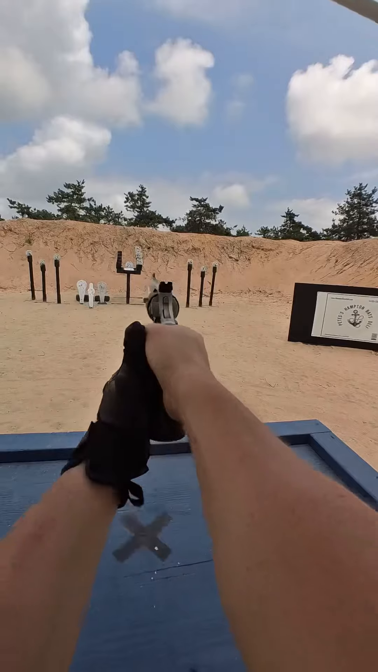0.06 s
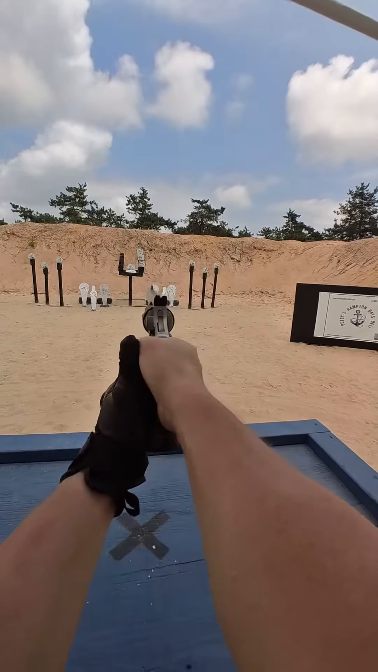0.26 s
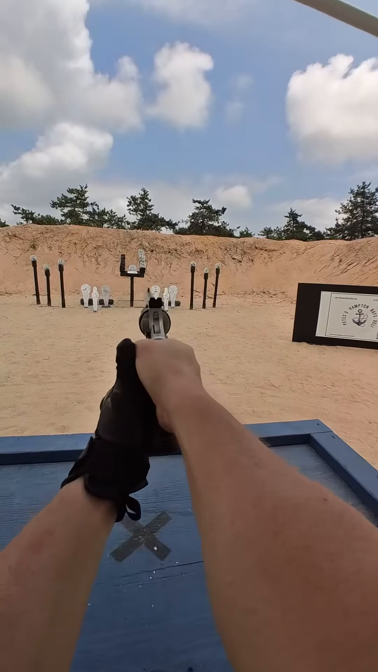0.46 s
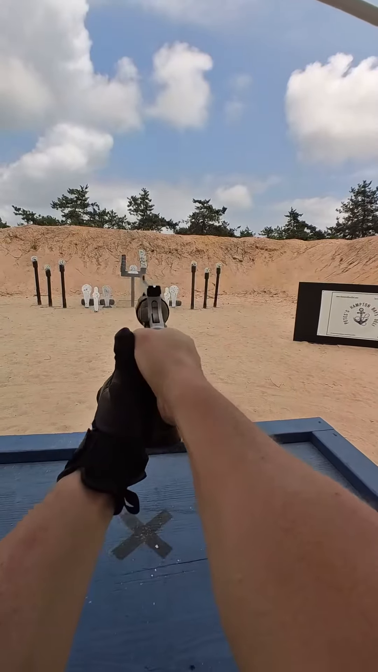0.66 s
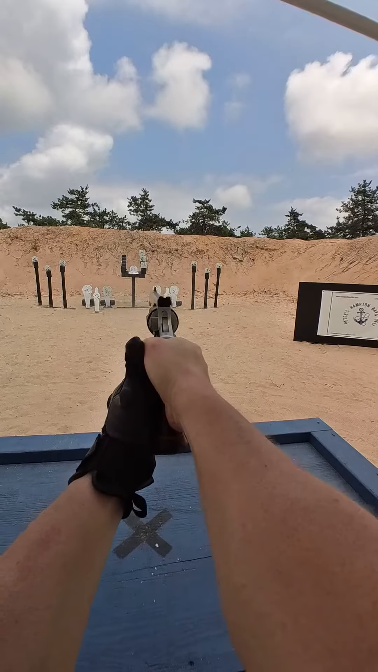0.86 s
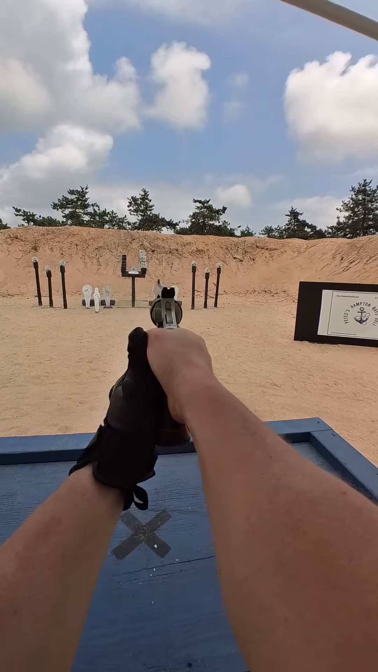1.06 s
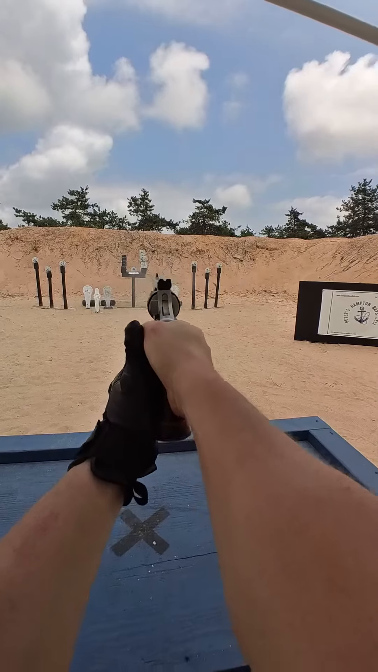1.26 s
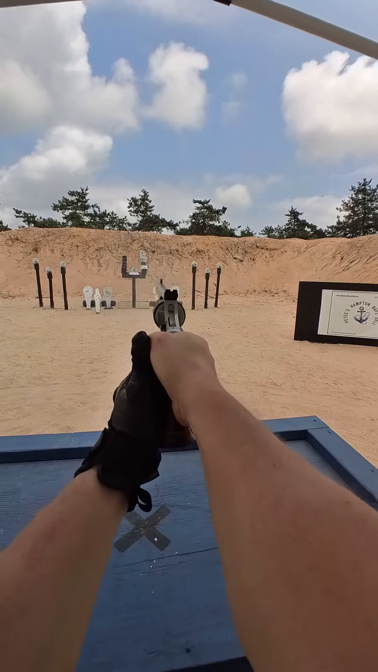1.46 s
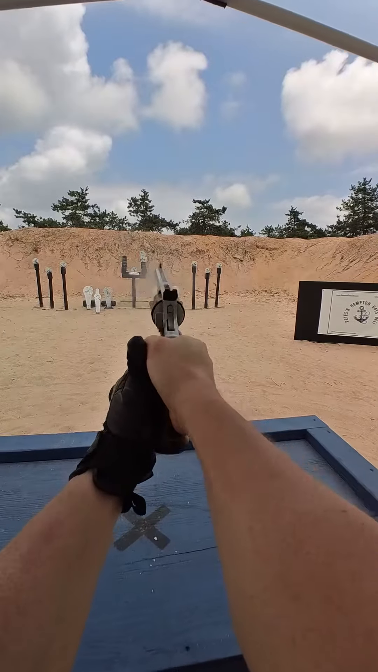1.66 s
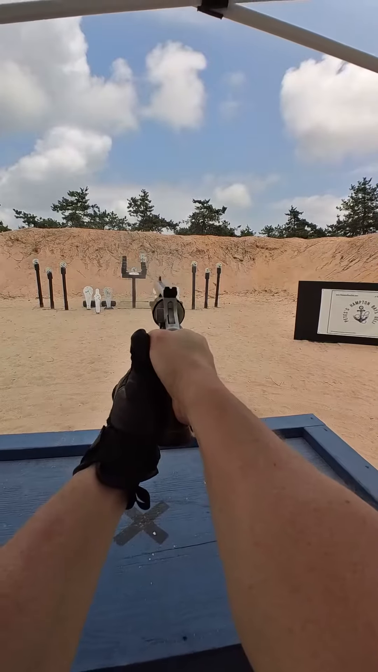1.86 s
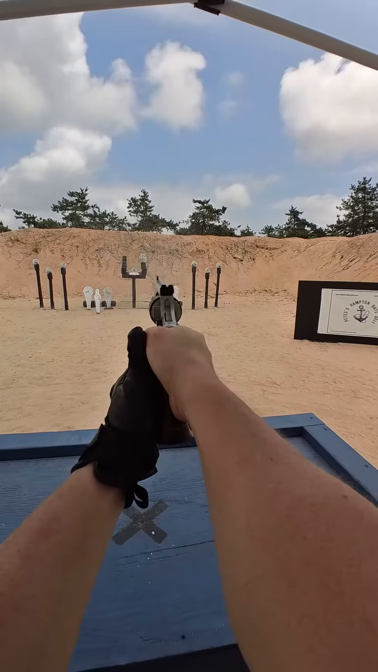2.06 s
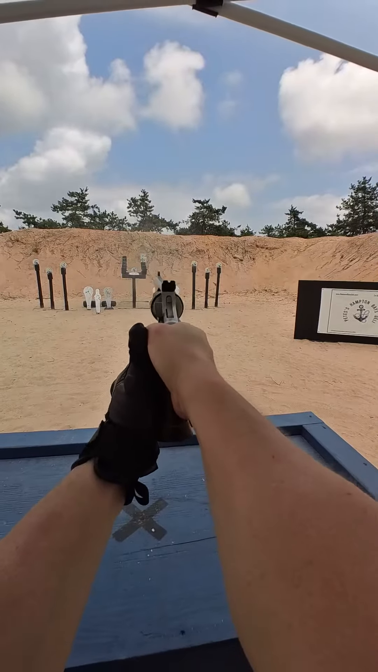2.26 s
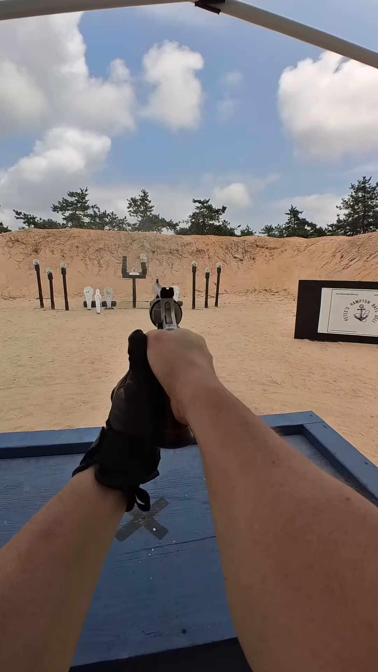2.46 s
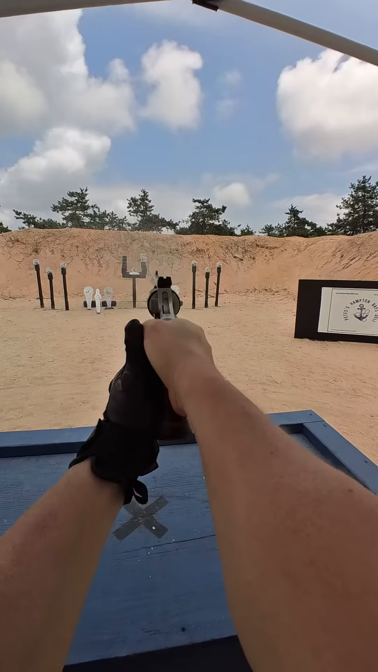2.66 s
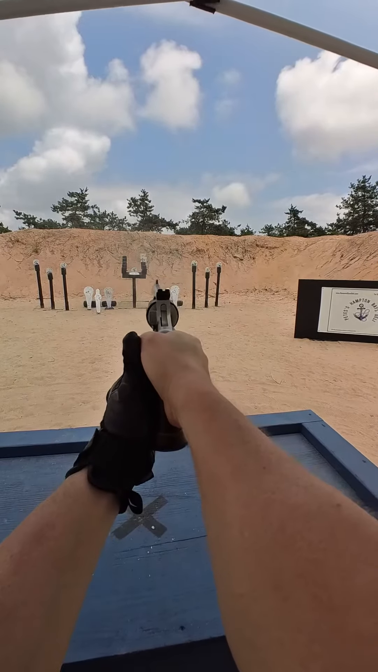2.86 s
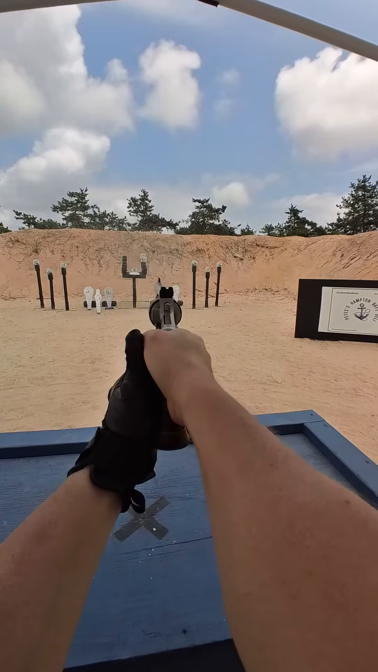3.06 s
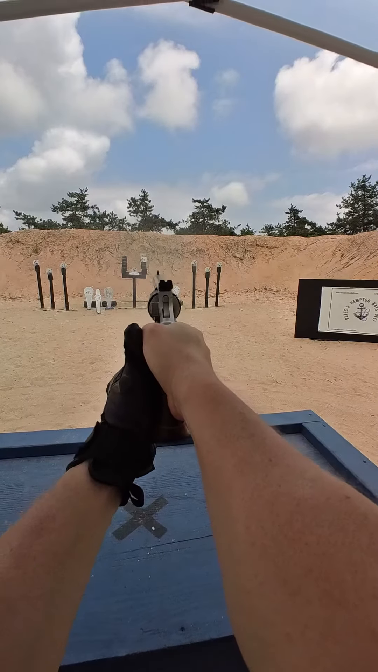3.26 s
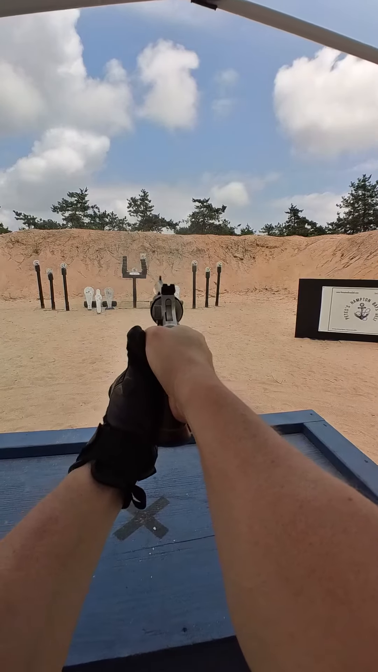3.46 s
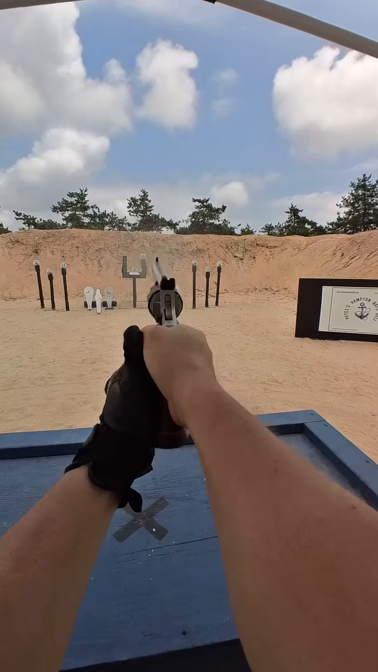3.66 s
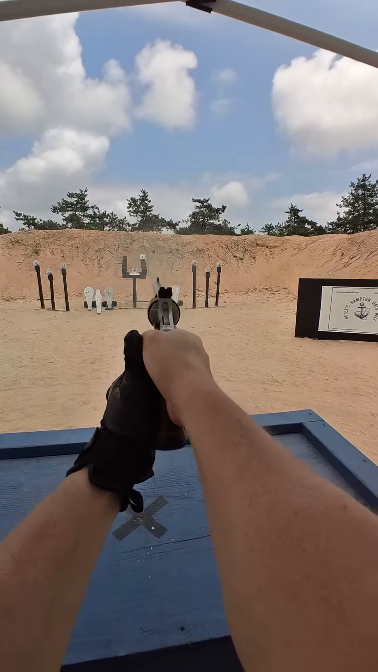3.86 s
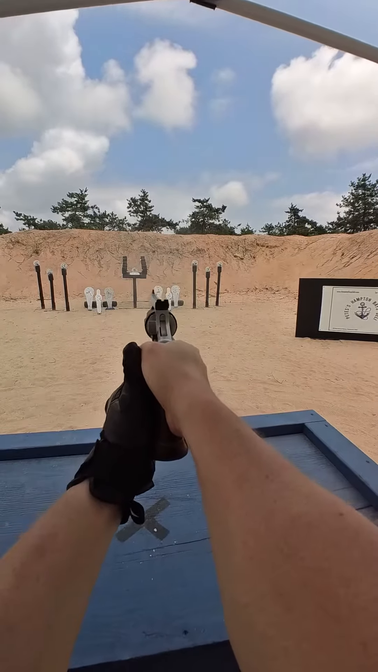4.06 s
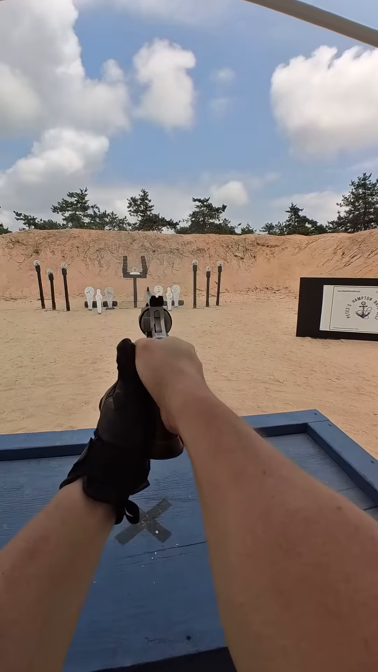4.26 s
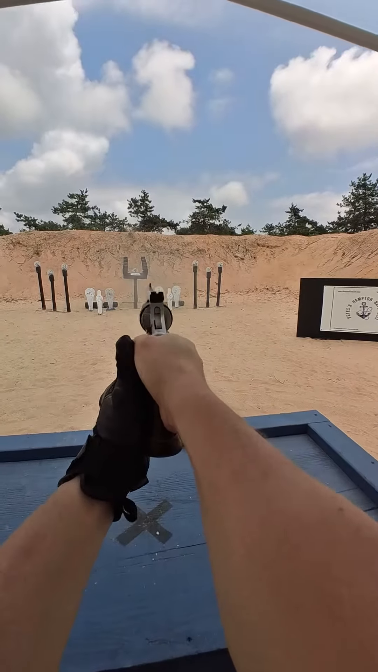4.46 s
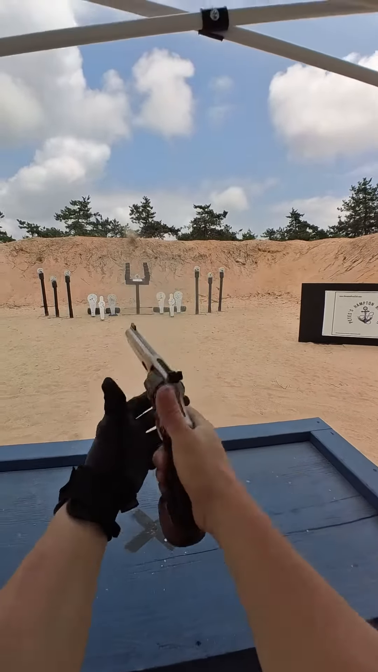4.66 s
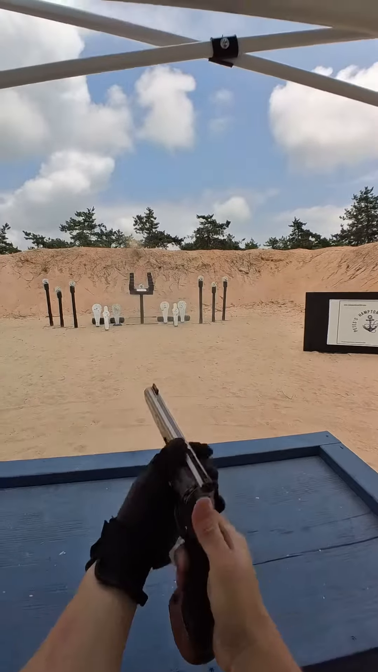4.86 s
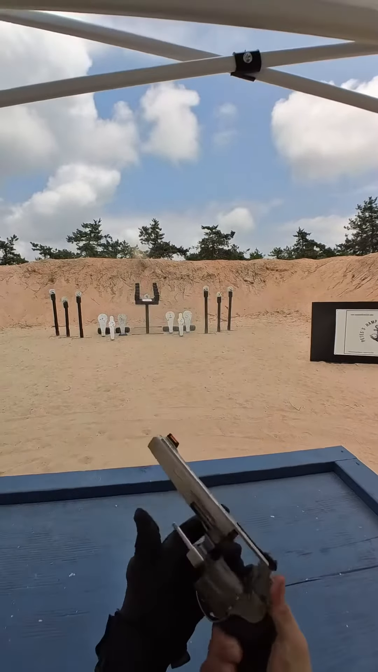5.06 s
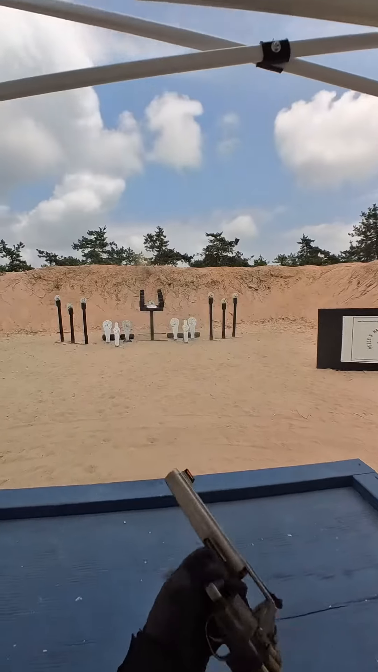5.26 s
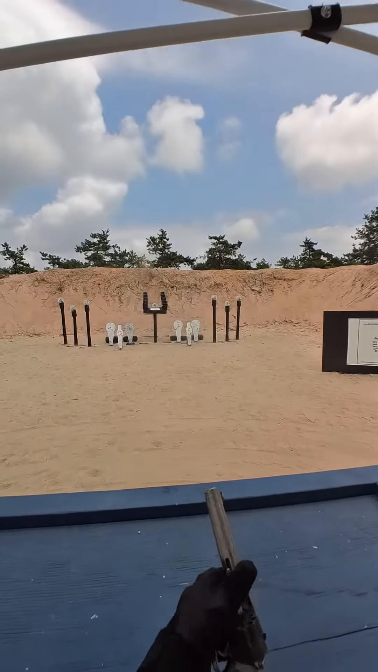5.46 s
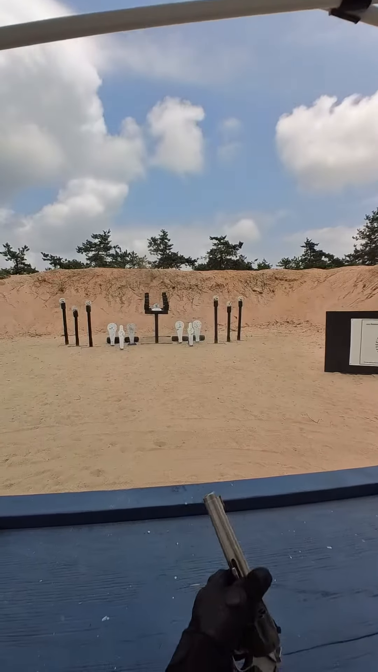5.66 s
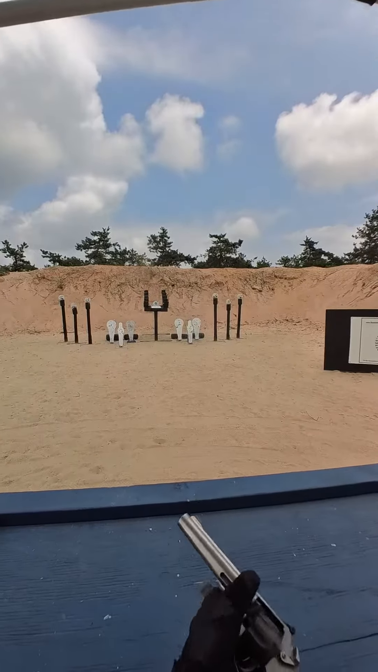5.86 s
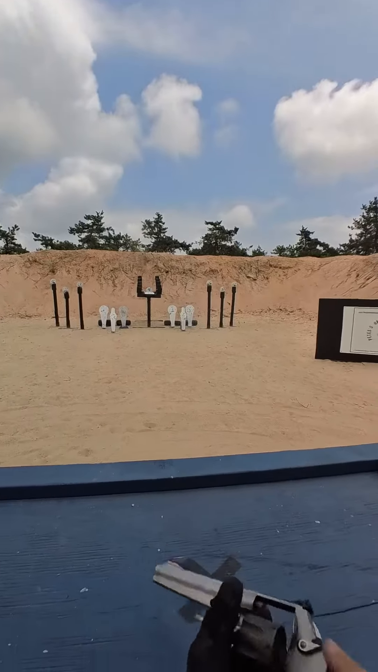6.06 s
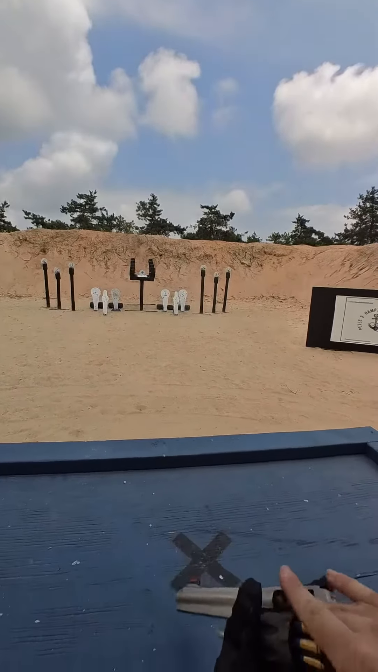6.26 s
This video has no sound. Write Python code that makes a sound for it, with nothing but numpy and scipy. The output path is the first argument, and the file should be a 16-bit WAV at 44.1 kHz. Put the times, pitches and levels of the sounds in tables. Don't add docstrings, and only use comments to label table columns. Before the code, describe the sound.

Shooter's-position stereo sound under a light roof outdoors: rapid revolver blasts, limited and roaring, with short slap echoes off sand banks. Distant steel plates sing at high, beating pitches after most shots, some landing with clanks and dull thuds. After the eighth shot the ringing dies, leaving quiet air and soft wind puffs. Small metallic snaps of the opening cylinder, light rustles and a gun set down on a wooden table finish it.

```python
import sys
import numpy as np
from scipy import signal
from scipy.fft import rfft, irfft, next_fast_len
from scipy.io import wavfile
from scipy.ndimage import uniform_filter1d, minimum_filter1d

SR = 44100
rng = np.random.default_rng(int(sys.argv[2]) if len(sys.argv) > 2 else 0)


def linear_from_db(decibels):
    return 10 ** (np.asarray(decibels, float) / 20)


def materialize(psi):
    bounded = np.clip(np.atleast_2d(psi).T, -1, 1)
    quanta = np.round(bounded * 32767).astype(np.int16)
    wavfile.write(sys.argv[1], SR, quanta)


N = 277817

# (frequency [Hz], coherence [0-1])
PORT_LIKENESS = [(60, 1), (150, 1), (600, 0.99), (1500, 0.89), (3000, 0.57), (6000, 0.19), (12000, 0.65)]

# (time [s], level [dB])
WIND_LEVEL = [(0.0, -44), (.3, -45.5), (.5, -41), (.65, -51), (1.04, -50), (1.08, -30), (1.12, -53),
              (2.0, -44.5), (2.37, -47), (2.5, -50), (2.77, -37.5), (3.02, -54), (3.28, -45), (3.4, -53.5),
              (4.1, -51.5), (5.49, -50.5), (5.81, -36), (6.3, -52.5)]
# (frequency [Hz], density [dB per Hz])
WIND_COLOUR = [(12, -22), (22, -6), (40, -1), (70, -2), (130, -9), (300, -28)]
# (frequency [Hz], density [dB per Hz])
AIR_COLOUR = [(35, -46), (60, -16), (258, -9.5), (501, -5), (549, -12), (1100, -16.5), (10400, -54),
              (14000, -101)]
AIR_DB = -49
# (middle [s], level [dB], half length [s])
RUSTLES = [(0.062, -47.5, 0.06), (5.3, -63.5, 0.82), (2.645, -40, 0.0032), (5.0, -38, 0.016),
           (5.173, -55, 0.033), (5.266, -44, 0.033), (5.449, -47, 0.015), (5.482, -36.5, 0.029),
           (5.7, -44, 0.033), (5.865, -34.5, 0.018), (5.903, -46, 0.028), (6.025, -57, 0.0096),
           (6.078, -46, 0.013), (6.18, -60, 0.021), (6.29, -52, 0.033), (1.152, -33, 0.0089),
           (3.514, -25, .014)]

# (frequency [Hz], density [dB per Hz])
TICK_COLOUR = [(240, -36), (1620, -12), (2280, -6), (3410, -4.5), (8800, -14.5), (10300, -15.5),
               (13000, -22), (16400, -65)]
# (frequency [Hz], density [dB per Hz])
HANDLING_COLOUR = [(240, -35), (400, 0), (979, -20), (1190, -5.5), (1640, -6), (3950, 1.5), (8560, -14.5),
                   (15000, -38)]
# (time [s], peak [dB], ring [Hz])
STRAYS = [(0.035, -32.5, 6150), (0.096, -22.5, 3600), (0.155, -34, 2000), (1.2266, -5.5, 4380),
          (1.713, -13.5, 3160), (2.5087, -23.5, 2280), (2.2, -35, 3050), (0.3136, -42.5, 2470),
          (4.9, -45, 3960), (3.4, -36, 3300), (4.443, -27, 1620)]
# (time [s], peak [dB], ring
# [Hz])
UNLOADING = [(4.9656, -20.5, 2230), (4.9941, -22.5, 2110), (4.998, -22, 3870), (5.0046, -27.5, 4150),
             (5.0092, -16.5, 3920), (5.0674, -16, 3700), (5.083, -26, 4500), (5.1027, -7.5, 3920),
             (5.1134, -19, 3640), (5.124, -22, 3130), (5.212, -28, 4140), (5.239, -24, 2120),
             (5.2798, -9, 3400), (5.2893, -9, 2460), (5.462, -17, 4170), (5.468, -17.5, 2970),
             (5.476, -20.5, 3670), (5.197, -35, 3500), (5.23, -35, 5200), (5.537, -29, 2280),
             (5.715, -20.5, 3150), (5.776, -26.5, 2670), (6.052, -7.5, 2700), (6.1592, -39, 5330),
             (6.228, -24.5, 2810), (6.2696, -9.5, 4160), (6.2884, -21, 2130), (6.2934, -10, 2050)]
# (hammer falls [s], length of pull [s], cylinder lock [dB], hammer [dB])
PULLS = [(0.6665, 0.042, -17, -2), (2.198, 0.045, -14, -6.5), (2.6383, 0.046, -13, -4),
         (3.1757, 0.06, -16.5, -7.5), (3.712, .0526, -15, -2.5), (4.4496, 0.047, -16.5, -12)]
LOCK_SHARE, TAKEUP_DB = 0.4, -6
TAKEUP_HZ, LOCK_HZ, HAMMER_HZ = 4680, 3400, 3250

# (time [s], level [dB], shift of the low roar [dB] and high roar [dB] while the plate rings)
SHOTS = [(.675, -18.5, -1.5, 6), (1.246, -19, -6, 2.5), (1.734, -17, -5, -1.5), (2.208, -19, 2, 5.5),
         (2.648, -17.5, -0.5, 3.5), (3.192, -19, -5.5, 0.5), (3.723, -20.5, 2, 4), (4.46, -19, 1, 6)]
# (frequency [Hz], density [dB per Hz])
ROAR_LOW = [(45, -48), (124, -11.5), (313, -1.5), (540, -11.5), (894, -0.5), (1600, -9.5), (3120, -9.5),
            (5280, -120)]
# (frequency [Hz], density [dB per Hz])
ROAR_HIGH = [(760, -38.5), (1300, 0), (2100, -3), (2900, 4), (3640, -6.5), (4190, -2), (7000, -15.5),
             (10000, -32)]
# (frequency [Hz], density [dB per Hz])
ROAR_TOP = [(3530, -7), (6000, -2), (6460, -8), (8260, -9), (13000, -18), (15500, -37), (16000, -44)]
# (delay [s], low [dB], high [dB], low sag [dB], high sag [dB])
FRONTS = [
    (0, 3, 7.5, 26, 13),
    (0.032, 2, -1, 11, -2),
    (0.05, 0.5, -3.5, 16.5, -0.5),
    (.15, -3.5, -4.5, 3, 3),
]
SAG_SHARE = [0.94, 0.43, 1, 0.24]
HOLD_S, FAR_HOLD_S = .17, 0.45
# (low [dB/s], high [dB/s])
ROAR_FALL = [134, 158]
# (low [dB], high [dB])
FAR_BANK = [-35.5, -36.5]
# (delay [s], peak [dB], frequency [Hz], length [cycles])
ECHOES = [(.0012, -10, 4000, 1.5), (.0055, -9, 500, 1.1), (.009, -14, 1800, 1.6), (.0375, -7, 950, 4.5),
          (.0535, -11, 850, 2.6), (.061, -14, 950, 6), (.133, -14, 3000, 1.2), (.125, -25, 120, 4),
          (.19, -26, 190, 4)]
SLAPS = [-34, -40, -36, -25, -25, -36, -34, -30]
SLAP_S = .132
# (frequency [Hz], density [dB per Hz])
SLAP_COLOUR = [(3000, -20.5), (6000, -4), (9000, -0.5), (13000, -7), (15600, -19.5)]
BOOMS = [-23, -24, -20.5, -14, -14, -27, -21, -18]
BOOM_S = .03
# (frequency [Hz], density [dB per Hz])
BOOM_COLOUR = [(550, -29.5), (760, -8.5), (900, 1), (1080, -4), (1400, -28)]

# (time [s], level [dB])
MAIN_LEVELS = [
    [(0.737, -34), (0.761, -23.5), (0.815, -5), (0.839, -13), (0.917, -37), (0.941, -32.5), (1.067, -55),
     (1.15, -40)],
    [(1.308, -19), (1.36, -17), (1.42, -12.5), (1.48, -17), (1.53, -16), (1.57, -6.5), (1.615, -14),
     (1.645, -15), (1.7, -47)],
    [(1.803, -39), (1.825, -12), (1.875, -25), (1.895, -13), (1.973, -9), (2.027, -13), (2.055, -25.5),
     (2.153, -26.5), (2.2, -38)],
    [(3.257, -39), (3.301, -39), (3.327, -19.5), (3.409, -33), (3.437, -13.5), (3.527, -31), (3.635, -28),
     (3.671, -54), (3.69, -42)],
    [(3.792, -26), (3.862, -11.5), (3.9, -24.5), (3.97, -11.5), (4.056, -13.5), (4.11, -24), (4.168, -19),
     (4.24, -32.5), (4.4, -53)],
    [(4.525, -37), (4.545, -25.5), (4.613, -18), (4.677, -35), (4.721, -56), (4.93, -69)],
]
# (time [s], level [dB])
SECOND_LEVELS = [
    [(0.737, -36), (0.821, -38), (0.849, -29), (0.873, -28), (0.919, -42), (1.141, -73), (1.15, -62)],
    [(1.308, -26.5), (1.384, -15.5), (1.41, -23), (1.536, -11.5), (1.658, -32.5), (1.7, -38)],
    [(1.803, -24.5), (1.823, -18), (1.893, -15.5), (2.059, -33.5), (2.091, -43), (2.185, -48), (2.2, -31)],
    [(3.257, -43.5), (3.273, -22), (3.291, -19.5), (3.421, -19.5), (3.475, -20.5), (3.527, -42),
     (3.573, -41), (3.69, -73)],
    [(3.792, -20.5), (3.848, -20.5), (3.902, -30), (3.978, -16), (4.028, -19.5), (4.078, -49), (4.116, -43),
     (4.222, -55), (4.3, -49)],
    [(4.525, -46), (4.583, -24), (4.625, -26.5), (4.757, -51), (4.93, -74)],
]
MAIN_HZ = [2692, 3577, 3625, 3622, 3567, 3354]
SECOND_HZ = [7515, 4307, 1432, 1593, 4285, 2406]
# (frequency [Hz]), the main tone standing apart
TONE_EDGES_HZ = [3700, 3700, 5200]
# (frequency [Hz], level [dB])
PLATE_A = [(1087, -34), (2239, -42), (2412, -38), (2692, -21), (2815, -34), (3354, -37), (4404, -41),
           (4780, -40), (6008, -37), (7515, -37), (10772, -39)]
# (frequency [Hz], level [dB])
PLATE_B = [(1319, -27), (1577, -40), (2126, -38), (2815, -34), (3090, -44), (3583, -17), (4307, -22),
           (4538, -42), (6686, -46), (7381, -47), (9205, -49), (10078, -45), (11073, -46), (11477, -52)]
# (frequency [Hz], level [dB])
PLATE_C = [(1432, -18), (2417, -41), (2670, -42), (3628, -16), (5486, -47), (6740, -36), (6783, -31),
           (7397, -49), (7434, -40), (7704, -48), (9313, -40), (10018, -54)]
# (frequency [Hz], level [dB])
PLATE_D = [(1330, -18), (1593, -18), (1960, -39), (2859, -26), (3628, -29), (4226, -36), (4355, -25),
           (4549, -39), (5679, -46), (6530, -39), (6735, -31), (7445, -35), (9286, -39), (11208, -43)]
# (frequency [Hz], level [dB])
PLATE_E = [(1012, -39), (1324, -38), (1567, -34), (2509, -44), (2853, -43), (3144, -43), (3564, -22),
           (4285, -26), (4457, -30), (4748, -48), (6702, -38), (11052, -42), (11461, -50)]
# (frequency [Hz], level [dB])
PLATE_F = [(1044, -37), (1502, -41), (1890, -37), (2406, -32), (3354, -28), (4258, -46), (4818, -40)]
# (full level [dB], swell from below [dB], hold [s], fall [dB/s])
LOW_TONES = [(-23.5, 19, 0.071, 151.5), (-25, 21.5, 0.19, 177), (-41, 5, 0.1, 111), (-15.5, 22, 0.12, 136),
             (-28.5, 8, 0.077, 135), (-34, 20, 0.091, 100)]
# (full level [dB], swell from below [dB], hold [s], fall [dB/s])
UPPER_TONES = [(-24, 2.08, 0.023, 136), (-36.5, 1, 0.16, 190), (-40, .1, .05, 88), (-23, 4.6, 0.19, 110),
               (-25.5, 0.12, 0.13, 200), (-27, 18, 0.084, 290)]
# (full level [dB], swell from below [dB], hold [s], fall [dB/s])
HIGH_TONES = [(-36.5, 1, 0.12, 130), (-38, -12, 0.15, 100), (-27, 3, 0.12, 164), (-25.5, 4, 0.16, 130),
              (-33, -12, 0.15, 144), (-46.5, 9, 0.088, 120)]
SWELL_S = 0.026
# (beat rate [Hz], twin's share [ratio], first dip after the strike [s])
BEATS = [(30, 0.21, 0.018), (17.7, 0.46, 0.054), (12, .05, 0.079), (19, 0.13, 0.049), (22.6, 0.23, 0.045),
         (20, 0.12, .03)]
# (level [dB], hold [s], fall [dB/s])
SHIMMERS = [(-40, 0.19, 106), (-40, 0.25, 97), (-31, 0.086, 100), (-28.5, 0.16, 104), (-29.5, 0.09, 101),
            (-39, 0.086, 100)]
SHIMMER_WIDTH_HZ, SHIMMER_TILT_DB_PER_KHZ = 9, -1.65

# (time [s], peak [dB], ring [Hz], ring relative [dB], t60 [s])
CLANKS = [(1.164, -16, 4930, -14, 0.22), (1.176, -15, 2850, -11.5, 0.33), (1.189, -28, 3100, -7.5, 0.17),
          (1.658, -12, 2880, 3.5, 0.097), (1.666, -8, 1610, 0.5, 0.12), (2.047, -19.5, 3900, -29, 0.23),
          (3.534, -20.5, 2894, 12, 0.12), (3.541, -16, 4840, -1, 0.15), (3.561, -23.5, 5450, -11, 0.37),
          (4.103, -14, 2920, -11, 0.21), (4.105, -16, 4160, -11, .05), (4.111, -30, 3120, 7.5, 0.23),
          (4.268, -23, 3150, 3, 0.28), (4.275, -40.5, 3600, 18, 0.24), (4.28, -33, 1550, 10, 0.09)]
# (frequency [Hz], density [dB per Hz])
CLANK_COLOUR = [(75, -44), (130, -15), (1100, -10.5), (1390, -2.5), (1650, -5.5), (3540, -3.5),
                (12400, -28), (16000, -49)]
# (time [s], peak [dB], t60 [s])
THUDS = [(1.163, -18, 0.13), (2.045, -23.5, 0.22), (3.564, -31.5, 0.27), (4.102, -26.5, 0.31),
         (4.27, -33.5, 0.23)]
# (frequency [Hz], density [dB per Hz])
THUD_COLOUR = [(100, -88), (200, -2), (290, 4), (420, -20), (900, -4), (1600, -32)]

# (time [s], peak [dB], wood relative [dB])
KNOCKS = [
    (5.104, -39, 3),
    (5.599, -2, -8.5),
    (5.689, -9.5, -8),
    (6.052, -8.5, -16),
]
# (frequency [Hz], density [dB per Hz])
KNOCK_COLOUR = [(88, -43), (240, -27), (538, -3.5), (1610, -15), (2640, -9.5), (4480, -20), (10400, -38.5),
                (15000, -47)]
# (frequency [Hz], level [dB], t60 [s])
TABLE_MODES = [(150, -22, 0.37), (252, -11, 0.18), (382, -8, 0.18), (454, -2.5, 0.11), (595, -14, 0.15),
               (1290, -19.5, 0.21)]
# (time [s], level [dB], t60 [s])
CYLINDER_RINGS = [(5.288, -39, .14), (5.288, -51, .9), (5.6, -50, .7), (5.692, -49, .5), (6.056, -62, .2)]
CYLINDER_HZ = [10105, 10172]


def evened(x):
    return x / np.sqrt(np.mean(x ** 2) + 1e-20)


def add(mix, s, sound):
    part = mix[:, round(s * SR):][:, :sound.shape[1]]
    part += sound[:, :part.shape[1]]


def noise(count, spectrum, alike=0.97):
    hz = np.log(np.fft.rfftfreq(count, 1 / SR) + 1)
    same_hz, same = np.transpose(PORT_LIKENESS)
    same = np.clip(alike * np.interp(hz, np.log(same_hz), same), 0, 1)
    a, b = rfft(rng.standard_normal((2, count)))
    colour_hz, colour_db = np.transpose(spectrum)
    colour = linear_from_db(np.interp(hz, np.log(colour_hz), colour_db, -90, -90))
    return evened(irfft(colour * [a, same * a + np.sqrt(1 - same ** 2) * b], count))


def drift(count, seconds):
    size = max(int(seconds * SR), 2)
    return evened(uniform_filter1d(uniform_filter1d(rng.standard_normal(count), size), size))


def burst(db, spectrum, t60, rise=0.00029, grain_db=1.5, count=16384):
    t = np.arange(count) / SR
    level_db = db - 60 * t / t60 + grain_db * drift(count, 0.0014)
    return linear_from_db(level_db) * (1 - np.exp(-t / rise)) * noise(count, spectrum)


def ring(db, hz, t60, count=16384):
    t = np.arange(count) / SR
    shift = rng.uniform(-.7, .7)
    return linear_from_db(db - 60 * t / t60) * np.sin(2 * np.pi * hz * t + [[0], [shift]])


def wind():
    t = np.arange(N) / SR
    rumble = noise(next_fast_len(N), WIND_COLOUR, .3)[:, :N]
    level_db = np.interp(t, *np.transpose(WIND_LEVEL)) + 3.5 * drift(N, .03)
    return rumble * linear_from_db(level_db + [[1.5], [-1.5]])


def distant_air():
    return linear_from_db(AIR_DB + 0.43 * drift(N, 0.032)) * noise(next_fast_len(N), AIR_COLOUR)[:, :N]


def rustle():
    t = np.arange(N) / SR
    strokes = np.zeros(N)
    for s, db, half in RUSTLES:
        width = np.where(t < s, 0.65 * half, 1.33 * half)
        strokes += linear_from_db(db) * np.exp(-((t - s) / width) ** 2)
    return strokes * linear_from_db(3.9 * drift(N, 0.0036)) * noise(next_fast_len(N), TICK_COLOUR)[:, :N]


def tick(db, hz, colour):
    snap = burst(db - 4, colour, .017, rise=.0007, grain_db=2, count=4096)
    echo = burst(db - 27.5, colour, 0.09, count=4096)
    return snap + ring(db - 7, hz, .024, count=4096) + echo


def pull(s, length, lock_db, hammer_db):
    return [(s - length, lock_db + TAKEUP_DB, TAKEUP_HZ),
            (s - LOCK_SHARE * length, lock_db, LOCK_HZ),
            (s, hammer_db, HAMMER_HZ)]


def roar_shape(t):
    arrive, *levels = np.transpose(FRONTS)
    k = np.maximum(np.searchsorted(arrive, t, "right") - 1, 0)
    settle = np.diff(arrive, append=HOLD_S + 1 / 20) * SAG_SHARE
    start_db, sag_db = np.array(levels)[:2, k], np.array(levels)[2:, k]
    near_db = start_db - sag_db * (1 - np.exp(-(t - arrive[k]) / settle[k]))
    fall, far_db = np.transpose([ROAR_FALL]), np.transpose([FAR_BANK])
    near = linear_from_db(near_db - fall * np.maximum(t - HOLD_S, 0))
    far = linear_from_db(far_db - fall * np.maximum(t - FAR_HOLD_S, 0))
    return uniform_filter1d(near + far, size=65)


def patchy(x, patch_db):
    z = signal.stft(x, nperseg=256)[2]
    patches = uniform_filter1d(rng.standard_normal(z.shape[1:]), size=6, axis=0)
    patches = evened(uniform_filter1d(patches, size=4, axis=1))
    return evened(signal.istft(z * linear_from_db(patch_db * patches), nperseg=256)[1][:, :x.shape[1]])


def shot(s, db, duck_low_db, duck_high_db):
    t = np.arange(32768) / SR
    low_gain, high_gain = roar_shape(t)
    ringing = np.clip((t - .062) / 0.011, 0, 1)
    low_lumps_db = 3.0 * drift(len(t), .004)
    high_lumps_db = 3.0 * drift(len(t), .001)
    low = low_gain * linear_from_db(duck_low_db * ringing + low_lumps_db) * noise(len(t), ROAR_LOW)
    top_db = -5.5 - 30 * t + 0.28 * duck_high_db * ringing
    top = linear_from_db(top_db) * patchy(noise(len(t), ROAR_TOP), 3.1)
    high = patchy(noise(len(t), ROAR_HIGH), 2.56) + top
    high = high_gain * linear_from_db(duck_high_db * ringing + high_lumps_db - 4.0) * high
    out = linear_from_db(db) * (low + high)
    for after, peak_db, hz, cycles in ECHOES:
        u = (t - after) * hz
        ducked_db = peak_db + duck_low_db * (after > .1)
        envelope = np.exp(-np.minimum((2.84 * u / cycles) ** 2, 50))
        out = out + linear_from_db(ducked_db) * np.cos(2 * np.pi * u) * envelope
    return s, out


def roof_boom(db):
    return burst(db, BOOM_COLOUR, 0.17, rise=0.011, count=8192)


def slap_echo(db):
    return burst(db, SLAP_COLOUR, .05, rise=.003, count=4096)


def side_level(t, db, swell_db, hold, fall):
    return db - swell_db * np.exp(-t / SWELL_S) - fall * np.maximum(t - hold, 0)


def shimmer(t, db, hold, fall):
    size = next_fast_len(len(t) + 1) * 2
    hz = np.fft.rfftfreq(size, 1 / SR)
    place, own = rng.random((70, 2)).T
    mode_hz = 4500 + 10500 * place ** 1.5
    height = linear_from_db(SHIMMER_TILT_DB_PER_KHZ * (mode_hz - 4500) / 1000 + 8.3 * own)
    peaks = height / (1 + ((hz[:, None] - mode_hz) / SHIMMER_WIDTH_HZ) ** 2)
    white = noise(size, [(10, 0), (23000, 0)])
    lines = irfft(rfft(white) * peaks.sum(1), size)[:, :len(t)]
    return linear_from_db(db - fall * np.maximum(t - hold, 0)) * evened(lines)


def tone_group(hz, main_hz, second_hz):
    if abs(hz - main_hz) < 40:
        return 1
    return 4 if hz == second_hz else np.searchsorted(TONE_EDGES_HZ, hz)


def plate(main, second, beat, crowd, low, upper, high, tones, main_hz, second_hz):
    s, main_db = np.transpose(main)
    t = np.arange(s[0], s[-1], 1 / SR)
    since = t - t[0]
    low_db, upper_db, high_db = (side_level(since, *family) for family in (low, upper, high))
    main_db = np.interp(t, s, main_db)
    second_db = np.interp(t, *np.transpose(second), right=-90)
    levels_db = uniform_filter1d([low_db, main_db, upper_db, high_db, second_db], size=301)
    group = [tone_group(hz, main_hz, second_hz) for hz, db in tones]
    rate, share, dip = beat
    out = shimmer(since, *crowd)
    for (hz, db), g in zip(tones, group):
        top_db = max(d for (f, d), k in zip(tones, group) if k == g)
        lean_db = 1.5 * drift(len(t), .03) * np.array([[1], [-1]])
        waver_db = lean_db + [2.2, 0, 2.2, 4, 0][g] * drift(len(t), .015)
        waver_db += (db < top_db - 9) * (4 * drift(len(t), 0.02) - 22 * since)
        turns = hz * np.cumsum(1 + .0012 * drift(len(t), .08)) / SR
        start = rng.uniform(0, 6)
        port_shift = rng.uniform(.3, 1.2) * min(hz / 3000, 1)
        phase = 2 * np.pi * turns + start + np.array([[0], [port_shift]])
        twin = (g == 1) * share * np.sin(phase - 2 * np.pi * rate * (since - dip))
        out += np.sqrt(2) * linear_from_db(levels_db[g] + db - top_db + waver_db) * (np.sin(phase) - twin)
    out *= np.minimum(1, (t[-1] - t) / 0.0039)
    crack = burst(-4, TICK_COLOUR, 0.007, rise=.0001) + burst(-25.5, ROAR_TOP, 0.078)
    add(out, 0, crack)
    return s[0], out


def thud(db, t60):
    return burst(db, THUD_COLOUR, t60)


def clank(db, hz, ring_db, t60):
    return burst(db, CLANK_COLOUR, t60, rise=0.0014) + ring(db + ring_db, hz, t60)


def knock(db, wood_db):
    wood = sum(ring(db + wood_db + mode_db, hz, t60) for hz, mode_db, t60 in TABLE_MODES)
    contact = burst(db + 8.0, KNOCK_COLOUR, 0.02, rise=0.0031)
    echo = burst(db - 16.5, KNOCK_COLOUR, 0.15)
    body = burst(db + wood_db - 14.5, THUD_COLOUR, 0.22)
    return contact + echo + wood.mean(0) + body


def cylinder(db, t60):
    return sum(ring(db - 3, hz, t60) for hz in CYLINDER_HZ) * linear_from_db(3 * drift(16384, .005))


def scene():
    mix, t = wind() + distant_air() + rustle(), np.arange(N) / SR
    ticks = [*STRAYS, *UNLOADING]
    for row in PULLS:
        ticks += pull(*row)
    for s, db, hz in ticks:
        closed = s < 5.06 or 5.2 < s < 5.3
        add(mix, s + .0006, tick(db, hz, TICK_COLOUR if closed else HANDLING_COLOUR))
    plates = [PLATE_A, PLATE_B, PLATE_C, PLATE_D, PLATE_E, PLATE_F]
    for steel in zip(MAIN_LEVELS, SECOND_LEVELS, BEATS, SHIMMERS, LOW_TONES, UPPER_TONES, HIGH_TONES,
                     plates, MAIN_HZ, SECOND_HZ):
        add(mix, *plate(*steel))
    for source, events in [(thud, THUDS), (clank, CLANKS), (knock, KNOCKS), (cylinder, CYLINDER_RINGS)]:
        for s, *settings in events:
            add(mix, s, source(*settings))
    for s, *_ in SHOTS:
        mix *= linear_from_db(np.interp(t - s, [-.011, -.003, .055, .06], [0, -16, -22, 0]))
    for row, slap_db, boom_db in zip(SHOTS, SLAPS, BOOMS):
        add(mix, *shot(*row))
        add(mix, row[0] + BOOM_S, roof_boom(boom_db))
        add(mix, row[0] + SLAP_S, slap_echo(slap_db))
    return mix


def band_limit(x):
    return signal.sosfilt(signal.butter(12, 16100, fs=SR, output="sos"), x)


def record(dry):
    room_db = np.minimum(-3 - 20 * np.log10(abs(dry).max(0) + 1e-9), 0)
    gain_db = uniform_filter1d(minimum_filter1d(room_db, size=65), size=33)
    size = next_fast_len(N)
    response = np.exp(-2j * np.pi * np.fft.rfftfreq(size) * [[.6], [0]])
    response /= 1 + (np.fft.rfftfreq(size, 1 / SR) / 15600) ** 12
    heard = irfft(rfft(dry * linear_from_db(gain_db), size) * response, size)[:, :N]
    return band_limit(heard)


dry = scene()
out = record(dry)
materialize(out)
```